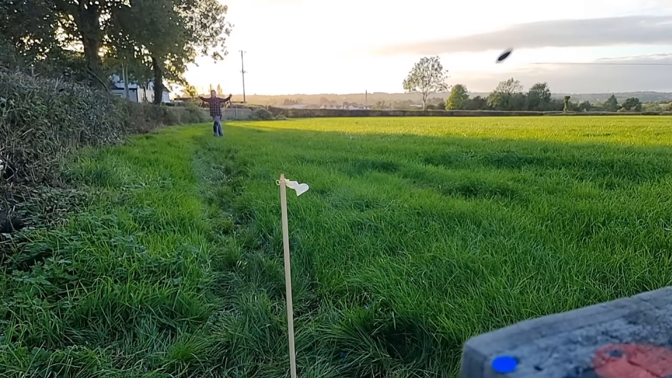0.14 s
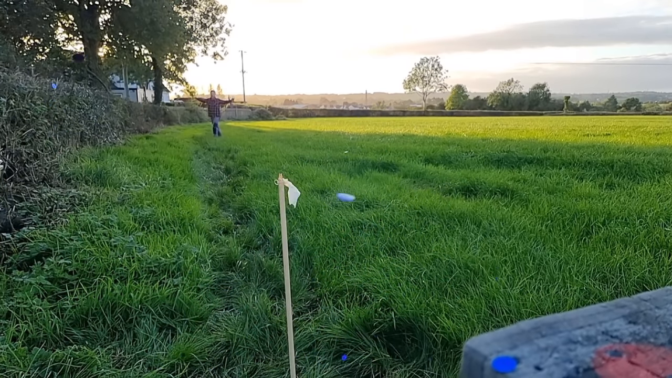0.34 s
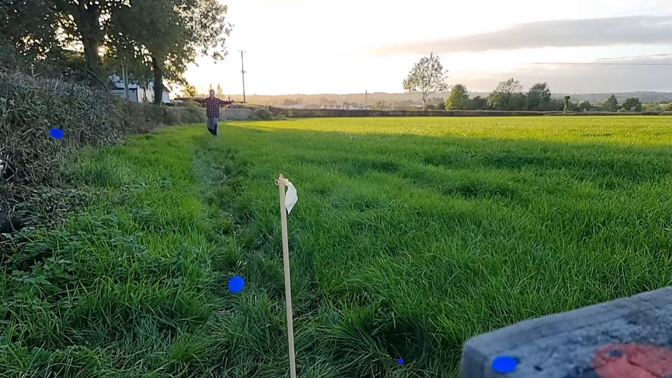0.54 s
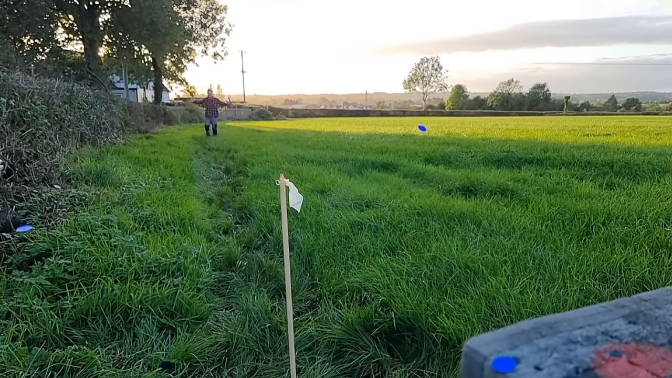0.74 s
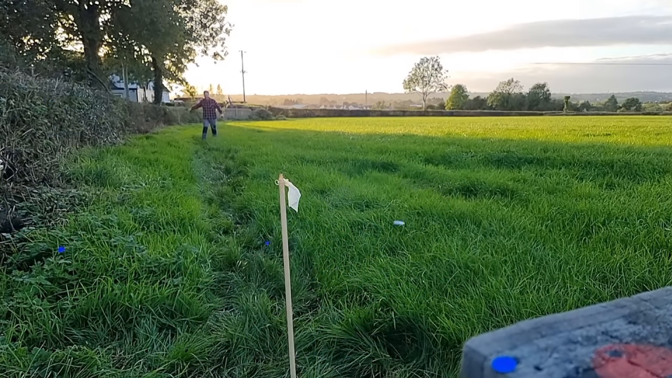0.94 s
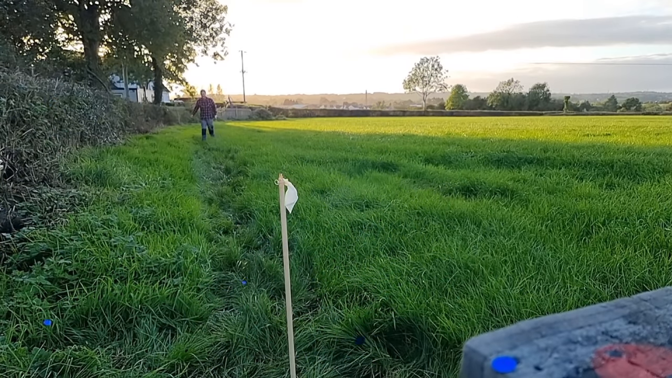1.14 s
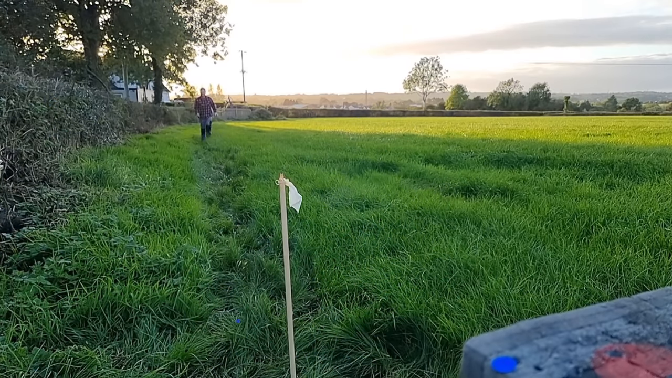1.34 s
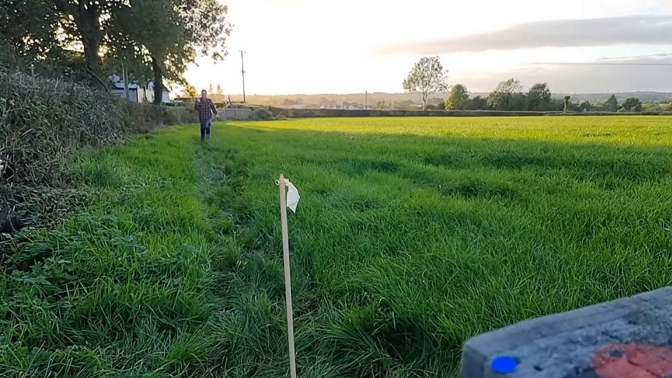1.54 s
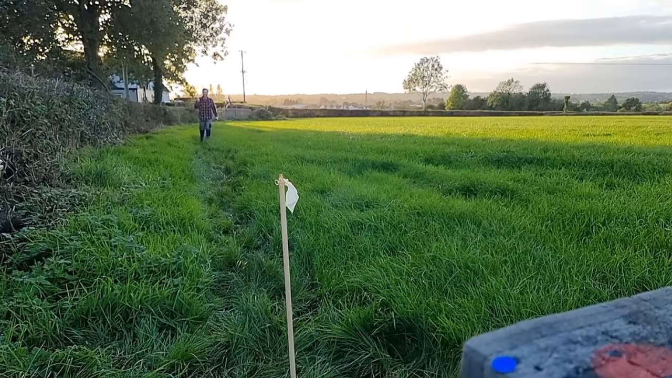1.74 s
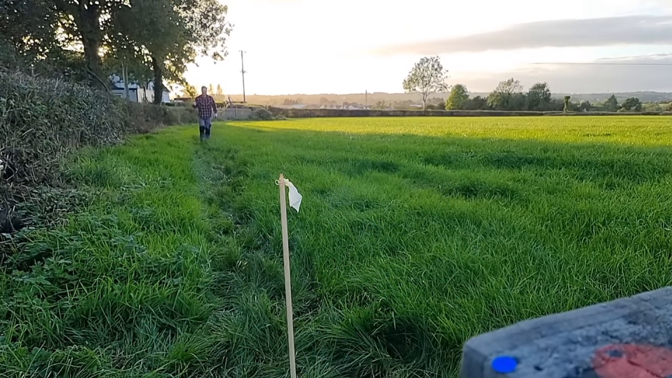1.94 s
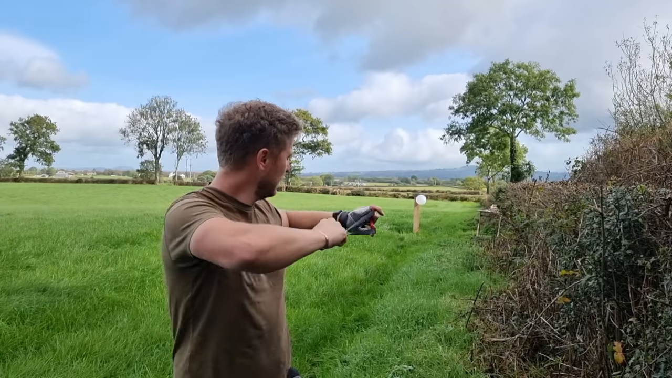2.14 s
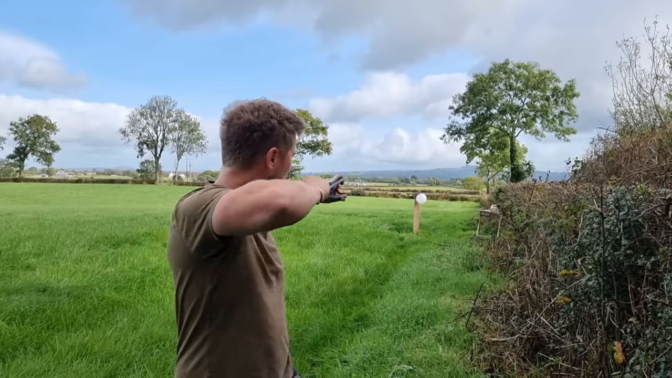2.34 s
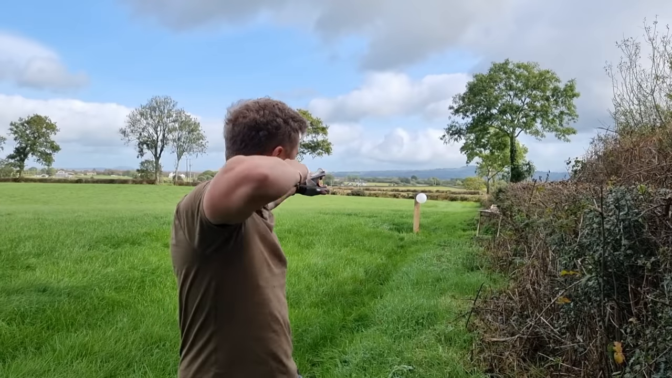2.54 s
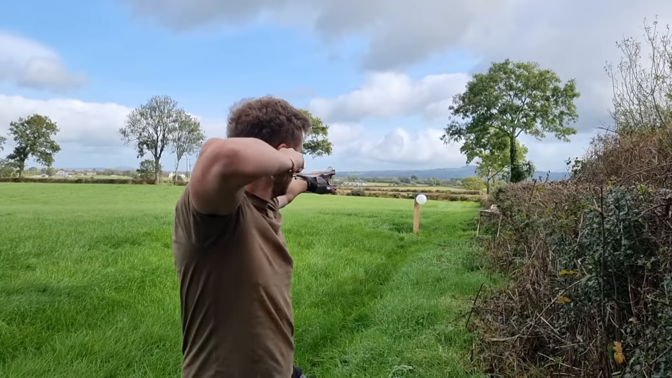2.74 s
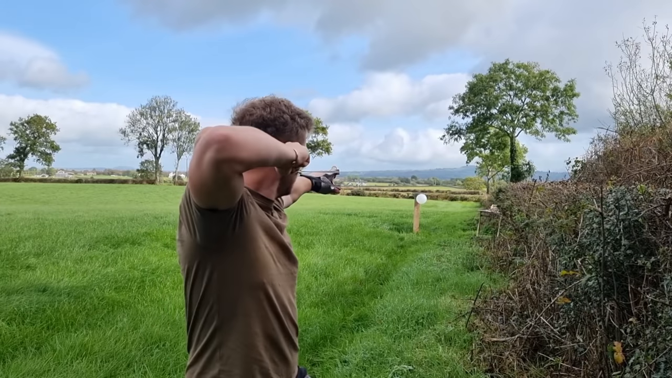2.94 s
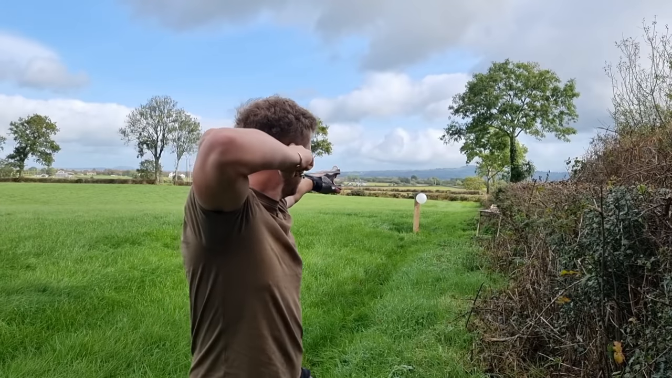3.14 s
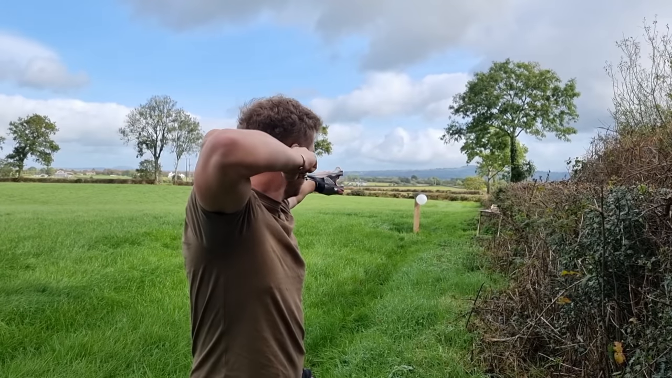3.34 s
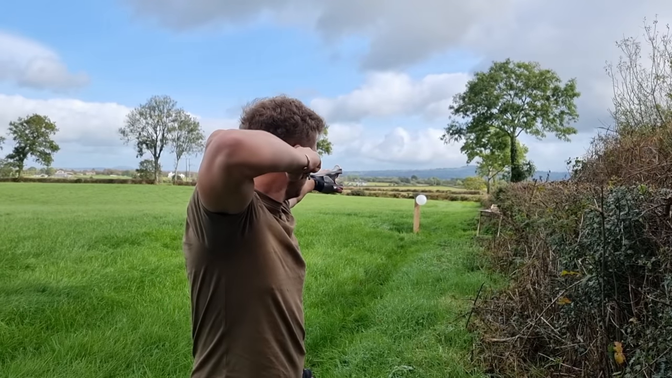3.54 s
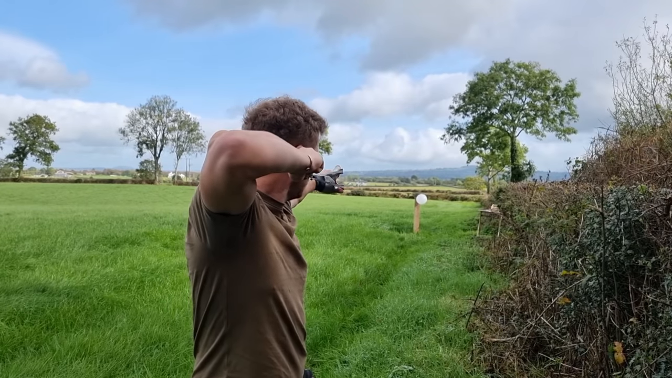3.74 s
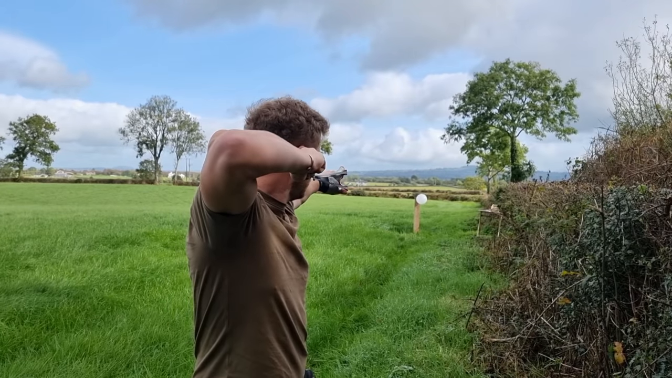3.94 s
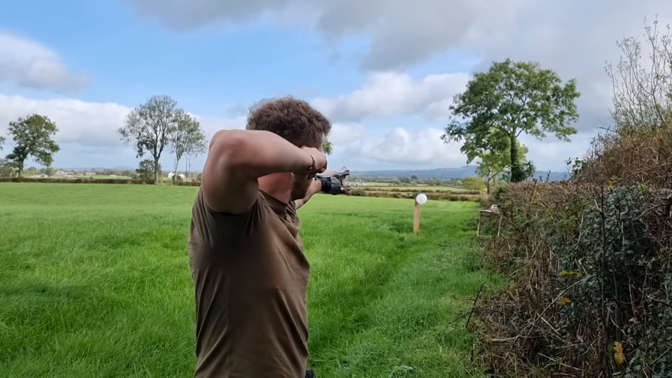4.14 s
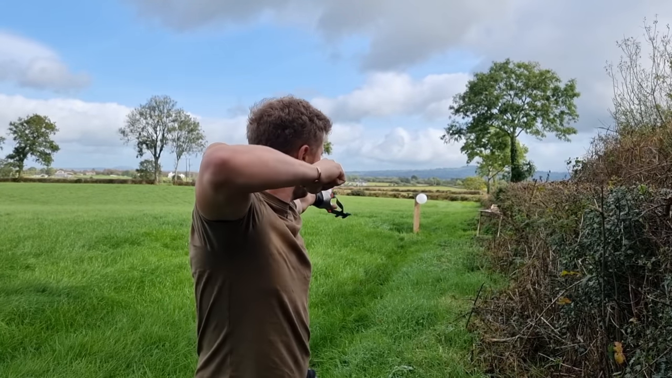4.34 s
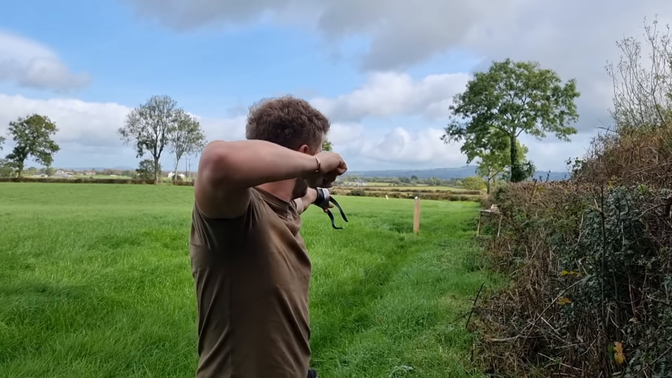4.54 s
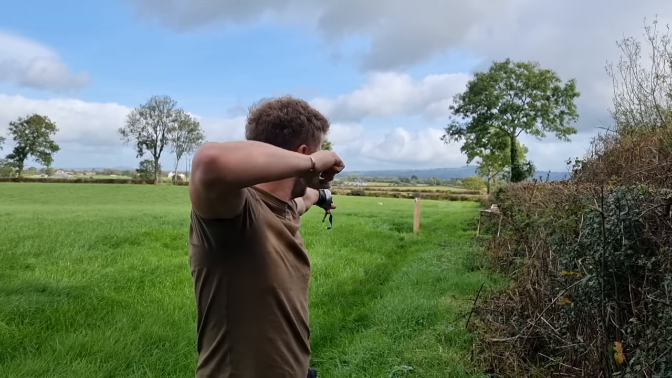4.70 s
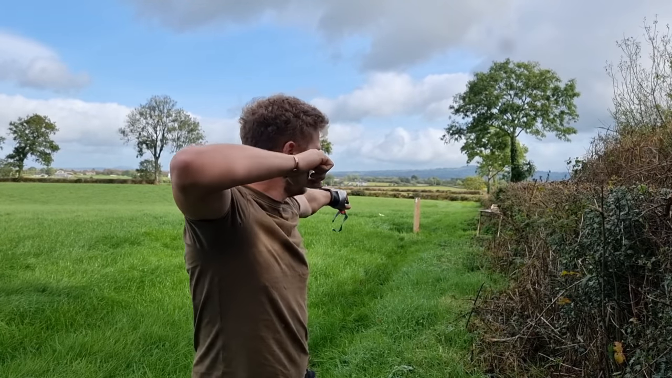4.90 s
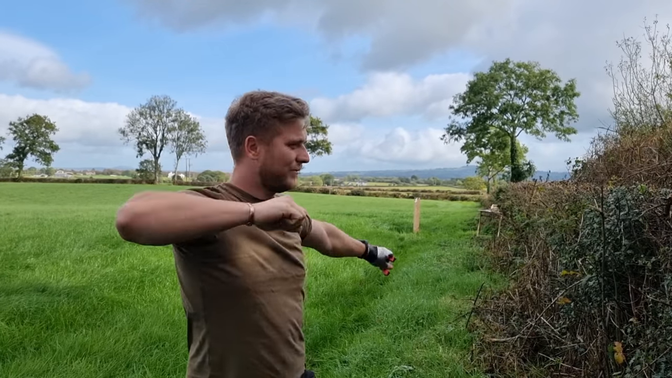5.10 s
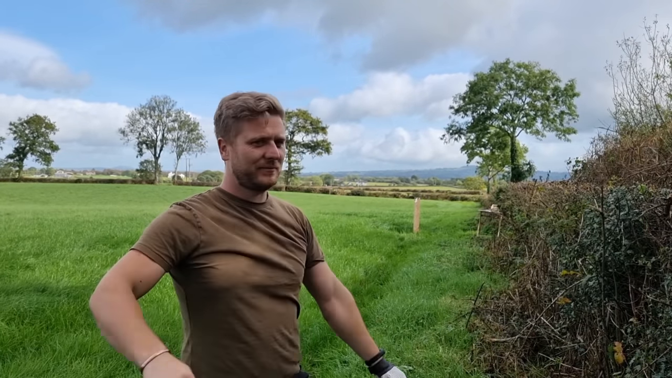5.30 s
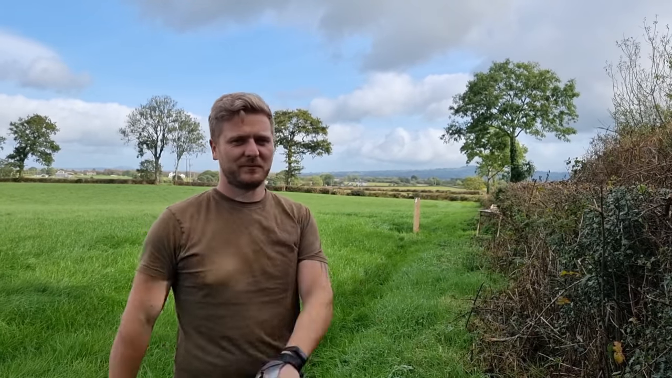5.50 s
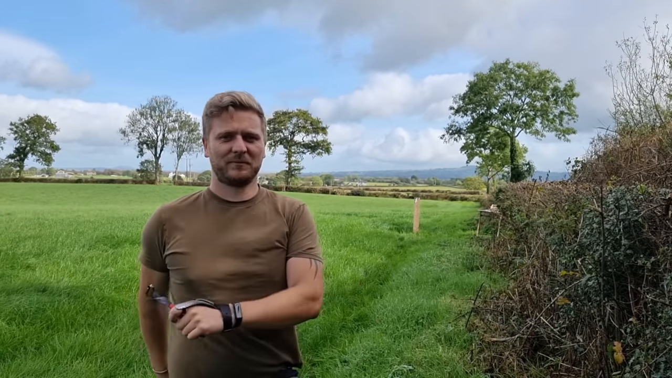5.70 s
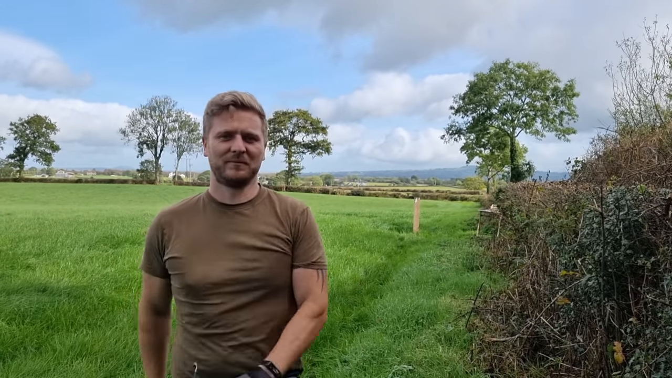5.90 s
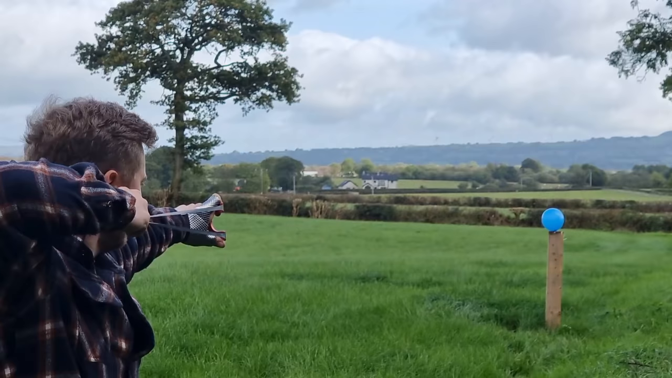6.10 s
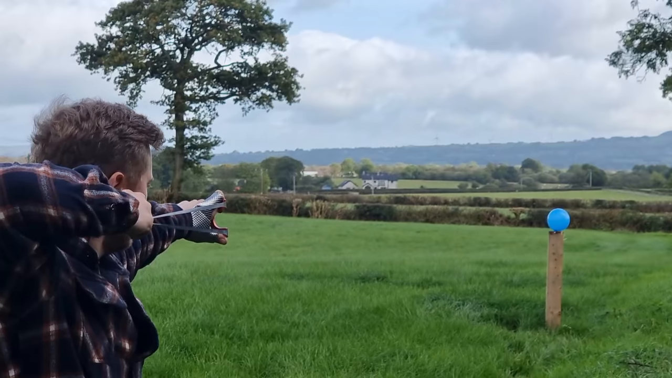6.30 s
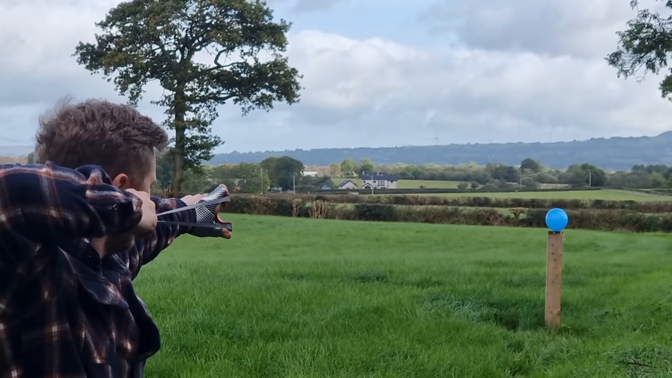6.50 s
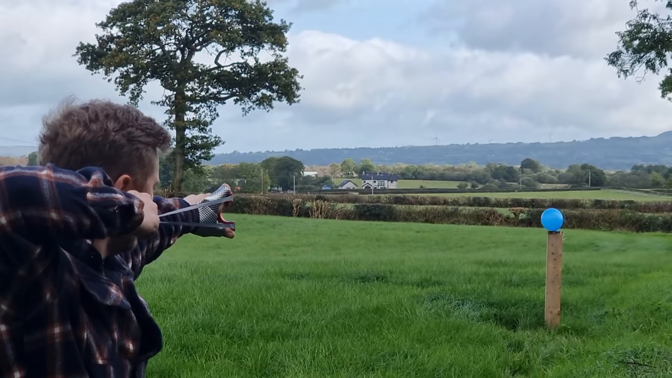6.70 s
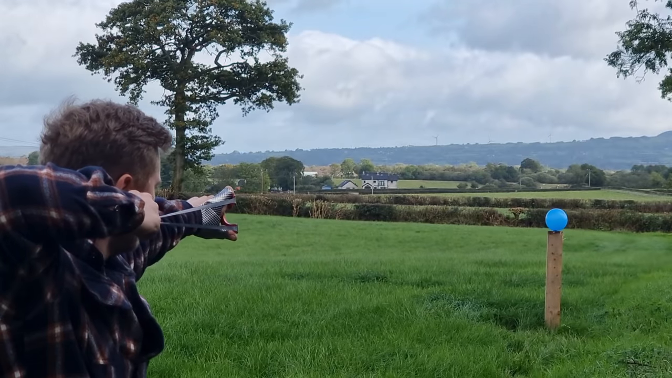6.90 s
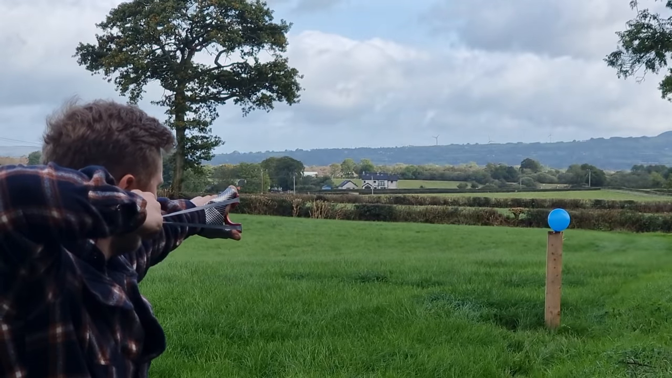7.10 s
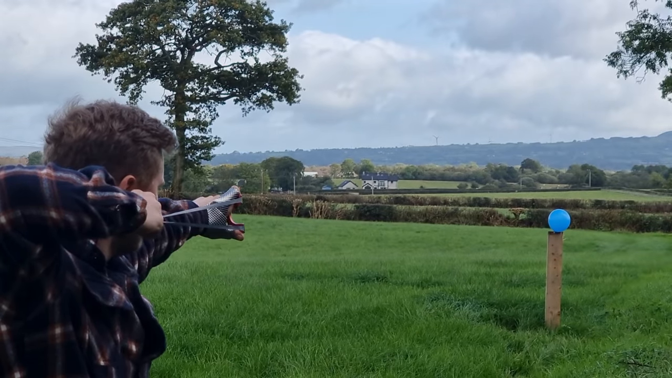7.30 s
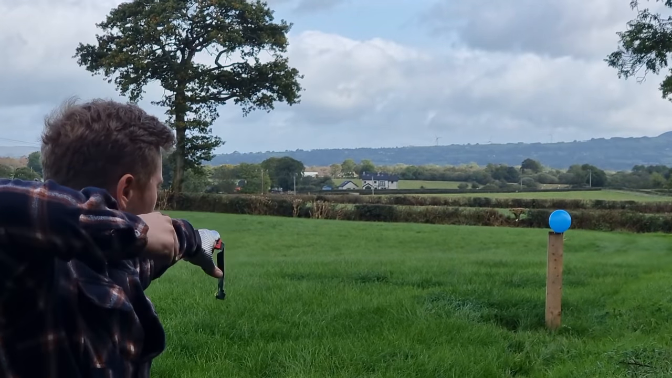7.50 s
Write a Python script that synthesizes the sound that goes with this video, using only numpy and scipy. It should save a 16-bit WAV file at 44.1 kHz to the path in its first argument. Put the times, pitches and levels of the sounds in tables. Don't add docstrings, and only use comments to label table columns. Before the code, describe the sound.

An open field in three takes, in stereo. From 0 to 2.4 s it is quiet: airy distant road noise, light wind, hoarse far rook calls from about 1 s and small crisp leaf rustles. At 2.4 s the background turns duller and wind rumbles unevenly against the microphone. A bird gives a high two-voiced buzz, then slurred whistles from the right until about 3.1 s, with faint rooks and low, slowing engines far off. At 4.33 s slingshot bands slap in a quick clatter with a short airy whip; at 4.60 s a balloon bursts, very loud and sharp, its bright echo scattering off hedge and trees until about 5.2 s. Wind continues, and cloth rubs near 6.1 s. From 6.3 s a new gusty take has a faint falling engine whine and paired, falling bird chips at 6.7-7.1 s. At 7.5 s the bands snap again, close and crisp, and it ends.

```python
import sys
import numpy as np
from scipy import signal
from scipy.io import wavfile

SR = 44100
rng = np.random.default_rng(int(sys.argv[2]) if len(sys.argv) > 2 else 0)


def dump_mix(stems):
    frames = np.atleast_2d(stems).T
    limited = np.clip(frames, -1, 1)
    pcm = np.round(limited * 32767).astype(np.int16)
    wavfile.write(sys.argv[1], SR, pcm)


def gain_from_db(level_db):
    decades = np.asarray(level_db, float) / 20
    return 10 ** decades


N = 332938
TIME = np.arange(N) / SR

TAKE_EDGES = (0, 2.375, 6.3, 7.56)


def in_time(rows, outside=None):
    s, *columns = np.transpose(rows)
    return [np.interp(TIME, s, column, outside, outside) for column in columns]


def span(rows):
    s, *columns = np.transpose(rows)
    a, b = int(s[0] * SR), min(int(s[-1] * SR), N)
    return a, b, [np.interp(TIME[a:b], s, column) for column in columns]


def at_hz(points, hz):
    points = np.array(points)
    return np.interp(np.log(hz), np.log(np.maximum(points[:, 0], 1)), points[:, 1])


def rms_one(x):
    return x / np.sqrt(np.mean(x ** 2) + 1e-20)


def drift(rate_hz, size):
    knots = rng.standard_normal(int(size / SR * 60) + 3)
    return np.interp(np.arange(size) / SR * min(rate_hz, 59), np.arange(len(knots)), knots) * 1.22


def bands(spectrum, size, lo_hz, hi_hz):
    settle = 4000
    white = rng.standard_normal((2, 2, size + settle))
    edges = np.geomspace(lo_hz, hi_hz, int(3 * np.log2(hi_hz / lo_hz)) + 2)
    for k, (low, high) in enumerate(zip(edges, edges[1:])):
        hz = np.sqrt(low * high)
        band = signal.butter(2, [low, high], "band", fs=SR, output="sos")
        rows = signal.sosfilt(band, white[k % 2])
        yield hz, gain_from_db(at_hz(spectrum, hz)) * rows[:, settle:]


def peak(x, hz, width_hz):
    r = np.exp(-np.pi * width_hz / SR)
    zeros = np.array([1, 0, -1]) * (1 - r * r) / 2
    return signal.lfilter(zeros, [1, -2 * r * np.cos(2 * np.pi * hz / SR), r * r], x)


def ring(x, hz, t60):
    r, w = gain_from_db(-60 / (t60 * SR)), 2 * np.pi * hz / SR
    return signal.lfilter([0, np.sin(w)], [1, -2 * r * np.cos(w), r * r], x)


def place(x, pan_db, lag):
    return np.array([np.roll(x, lag) * gain_from_db(pan_db / 2), x * gain_from_db(-pan_db / 2)])


def scatter(x, t60, a_s, b_s):
    a, b = int(a_s * SR), int(b_s * SR)
    lag = np.arange(int(.45 * SR)) / SR
    tail = rng.standard_normal((2, len(lag))) * gain_from_db(-60 * lag / t60) * (lag > .003)
    tail = tail / np.sqrt(np.sum(tail ** 2) / 2)
    out = np.zeros((2, N))
    out[:, a:b] = signal.fftconvolve(x[None, a:b], tail, axes=1)[:, :b - a]
    return out


# pitch_hz, density_db (per Hz)
AIR_COLOUR = [
    [(59, -30), (100, 1.5), (223, -7.5), (370, -20), (552, -12), (898, -9), (1590, -21), (1850, -28.5),
     (2050, -35.5), (2580, -37.5), (5280, -41), (6660, -35.5), (8230, -48.5), (9340, -40), (13900, -42.5),
     (15500, -58)],
    [(59, -30), (100, -7.5), (146, -10.5), (205, -13.5), (233, -15.5), (270, -17), (306, -18.5),
     (340, -15.5), (429, -20), (1160, -22.5), (2220, -43), (6530, -49.5), (8060, -69), (15500, -63.5)],
    [(59, -30), (100, -3), (162, -15.5), (233, -19), (758, -19.5), (808, -20.5), (1370, -29.5),
     (1550, -32.5), (2750, -42.5), (2990, -40), (3180, -45.5), (6530, -53), (7890, -69.5), (15500, -58.5)],
]
# pitch_hz, side_minus_mid_db
AIR_WIDTH = [
    [(60, -11), (110, -17), (200, -10), (380, -4.5), (700, -2), (1290, 5), (2380, -0.5), (4400, 2.5),
     (8120, -2.5), (15000, 2.5)],
    [(60, -1), (110, -10.5), (200, -8.5), (380, -0.5), (700, 7.5), (1290, 2.5), (2380, 0), (4400, 1.5),
     (8120, 1), (15000, 1.5)],
    [(60, -1), (110, -8), (200, -19), (380, -7), (700, -1), (1290, 1.5), (2380, -1), (4400, 0.5),
     (8120, -1), (15000, 1.5)],
]
AIR_TOP_HZ = [15500, 7600, 7600]
# time_s, level_db
ROAD_LEVEL = [(0.0, -76.5), (0.14, -71.5), (1.03, -66.5), (2.65, -65.5), (4.79, -63.5), (5.3, -63.5),
              (6.5, -62), (7.55, -62.5)]


def field(patchy_db=1.6):
    out = np.zeros((2, N))
    for a_s, b_s, colour, width, top_hz in zip(TAKE_EDGES, TAKE_EDGES[1:], AIR_COLOUR, AIR_WIDTH, AIR_TOP_HZ):
        a, b = int(a_s * SR), min(int(b_s * SR), N)
        far, hiss = np.zeros((2, b - a)), np.zeros((2, b - a))
        road_power = 1e-20
        for hz, (mid, side) in bands(colour, b - a, 100, 15500):
            road_power += np.mean(mid ** 2) * (450 < hz < 1400)
            rows = mid + gain_from_db(at_hz(width, hz)) * side * [[1], [-1]]
            edge_lift_db = 11.0 * (.9 * top_hz < hz < 1.1 * top_hz)
            rows = rows * gain_from_db(patchy_db * drift(11, b - a) + edge_lift_db)
            if hz < 1.1 * top_hz:
                far = far + rows
            else:
                hiss = hiss + rows
        far = signal.sosfilt(signal.cheby2(8, 30, top_hz, fs=SR, output="sos"), far)
        out[:, a:b] = (far + hiss) / np.sqrt(road_power)
    return out * gain_from_db(in_time(ROAD_LEVEL)[0])


# time_s, level_db
WIND_LEVEL = [(0.0, -80), (.5, -68.5), (1.0, -72), (1.5, -63), (2.3, -67.5), (2.44, -57.5), (2.8, -51.5),
              (3.45, -51), (4.0, -54), (4.65, -47.5), (5.3, -53), (6.0, -55.5), (6.8, -45.5), (7.15, -54),
              (7.55, -54.5)]
# pitch_hz, density_db (per Hz)
WIND_COLOUR = [(12, -36), (20, -2), (48, 2), (70, 3), (83, -3), (231, -33), (274, -31), (300, -25),
               (390, -55), (660, -120)]
# time_s, above_wind_db, left_minus_right_db
PORT_EDDIES = [(2.94, 6, 6.5), (3.32, 8.5, -11), (3.392, 6.5, 6), (3.56, 3, -9), (3.731, 6.5, 3),
               (3.849, 6, 12), (4.3, 5.5, -7), (5.27, 6, 10), (5.5, 9.5, 4), (5.8, 6.5, -3.5),
               (6.58, 2, 5.5), (6.9, 8, -3), (7.02, 6, -1.5), (7.38, 5.5, -8.5)]


def wind(lumpy_db=3.5):
    eddy_s, lean_left_db = 0.066, 3
    times, eddy_db, eddy_pan_db = np.transpose(PORT_EDDIES)
    reach = np.array([np.exp(-((TIME - s) / eddy_s) ** 2) for s in times])
    level_db = in_time(WIND_LEVEL)[0] + eddy_db @ reach
    pan_db = lean_left_db + eddy_pan_db @ reach
    brighten = np.where(TIME < TAKE_EDGES[2], .1, .9) * (level_db + 48.5)
    rumble = sum(rows * gain_from_db(brighten * (hz > 100)) for hz, rows in bands(WIND_COLOUR, N, 15, 300))
    left, right = rms_one(rumble)
    alike = np.where(TIME < TAKE_EDGES[1], .87, .1)
    right = alike * left + np.sqrt(1 - alike ** 2) * right
    lumps = gain_from_db([lumpy_db * drift(16, N) + pan_db / 2, lumpy_db * drift(20, N) - pan_db / 2])
    return np.array([left, right]) * lumps * gain_from_db(level_db + 6.0)


# time_s, reach_s, level_db
STIRS = [
    [(0.912, 0.043, -80.5), (1.066, 0.04, -77.5), (1.18, 0.15, -81.5), (1.49, 0.015, -71.5),
     (1.624, 0.088, -72), (1.798, 0.026, -74), (2.32, 0.043, -72.5)],
    [(6.08, 0.15, -78.5), (6.15, 0.053, -71.5), (6.236, 0.039, -73)],
]
# pitch_hz, density_db (per Hz)
STIR_COLOUR = [
    [(1470, -34), (2500, -2), (3430, -0.5), (4590, -1.5), (6630, 7), (8420, -2.5), (14000, -5),
     (15000, -14)],
    [(1470, -31), (2500, 1), (3170, -4.5), (6850, -1), (7800, -18), (8160, -32), (9660, -5.5), (11200, -10),
     (13600, -6.5), (15500, 2)],
]


def rustle(grain_db=2.0):
    fall_db = 9
    out = np.zeros((2, N))
    for stirs, colour in zip(STIRS, STIR_COLOUR):
        a, b = int((stirs[0][0] - .3) * SR), int((stirs[-1][0] + .15) * SR)
        t = TIME[a:b]
        power = sum(gain_from_db(db - fall_db * np.abs(t - s) / reach) ** 2 for s, reach, db in stirs)
        hiss = rms_one(sum(rows for hz, rows in bands(colour, b - a, 2500, 15500)))
        out[:, a:b] = hiss * np.sqrt(power) * gain_from_db(2.5 + grain_db * drift(45.0, b - a))
    return out


# start_s, length_s, start_hz, end_hz, level_db
ROOK_CALLS = [(3.59, 0.099, 3650, 3730, -79), (1.061, 0.163, 1550, 1620, -67),
              (1.372, 0.093, 1485, 1566, -64), (1.407, .22, 1950, 1474, -65.5),
              (1.487, 0.21, 2230, 2030, -72), (1.662, 0.054, 2250, 1870, -64),
              (1.809, 0.088, 2250, 2600, -71.5), (1.97, 0.083, 1480, 1410, -68),
              (1.998, 0.21, 1950, 1700, -69.5), (2.302, 0.066, 2270, 2200, -75),
              (6.31, 0.027, 2090, 2100, -74), (6.405, .028, 2900, 2950, -71),
              (6.747, 0.031, 2460, 1830, -65.5), (6.751, .024, 3380, 2850, -73),
              (6.886, 0.054, 2270, 1800, -71), (7.053, .025, 2290, 2100, -72),
              (3.093, 0.068, 3050, 3270, -68.5), (.7, .12, 2330, 2290, -82), (3.1, 0.11, 1400, 1270, -62),
              (3.13, 0.17, 1850, 1666, -71), (6.302, 0.0075, 1500, 900, -56.5),
              (1.88, 0.061, 1950, 1890, -71)]


def rooks():
    clear_s, hoarse_s, hoarseness = 0.052, 0.057, 0.51
    out = np.zeros(N)
    for s, long, from_hz, to_hz, db in ROOK_CALLS:
        a, size = int(s * SR), int(long * SR)
        rough = signal.lfilter([1], [1, -1.93, .9312], rng.standard_normal(12000))
        rough = rms_one(rough[2000:])[:size]
        hoarse = hoarseness * np.clip((long - clear_s) / (hoarse_s - clear_s), 0, 1)
        tone = np.sin(2 * np.pi * np.cumsum(np.linspace(from_hz, to_hz, size)) / SR)
        voice = (1 - hoarse + hoarse * rough) * tone
        out[a:a + size] += gain_from_db(db) * voice * signal.windows.tukey(size, .6)
    return out


def whistle(rows, second_db, warble_hz, warble_rate):
    out = np.zeros(N)
    a, b, (hz, level_db) = span(rows)
    beat = 2 * np.pi * warble_rate * TIME[a:b] + 1.5 * drift(50, b - a)
    turn = 2 * np.pi * np.cumsum(hz + warble_hz * np.sin(beat)) / SR
    tone = np.sin(turn) + gain_from_db(second_db) * np.sin(2 * turn)
    tone = tone + gain_from_db(second_db - 11) * np.sin(3 * turn) * (hz < 5200)
    out[a:b] = np.sqrt(2) * gain_from_db(level_db) * tone * signal.windows.tukey(b - a, .1)
    return out


# time_s, pitch_hz, level_db
BUZZ_VOICES = [
    [(2.375, 8300, -82), (2.395, 8560, -63), (2.412, 7820, -55.5), (2.435, 7820, -53), (2.46, 8260, -56),
     (2.485, 8070, -56), (2.515, 7930, -53.5), (2.545, 8020, -65), (2.585, 8100, -77)],
    [(2.37, 7140, -79), (2.395, 7450, -59), (2.406, 7250, -68), (2.411, 6980, -48.5), (2.44, 7140, -55),
     (2.47, 7480, -51.5), (2.505, 7140, -55.5), (2.527, 7200, -61.5), (2.56, 7200, -74.5)],
]
BUZZ_TREMBLE_HZ = [140., 210.]
BUZZ_PARTIAL_DB = [-24, -18]
# time_s, pitch_hz, level_db
PULSED_NOTE = [(2.605, 6500, -65), (2.609, 5550, -52.5), (2.614, 4520, -50.5), (2.628, 4265, -40.5),
               (2.641, 4620, -39), (2.652, 4350, -40), (2.671, 4217, -43), (2.686, 4270, -49.5),
               (2.697, 4380, -55)]
# time_s, pitch_hz, level_db
SWELLING_NOTE = [(2.828, 5570, -61), (2.833, 5030, -52), (2.842, 4644, -44), (2.858, 4683, -39),
                 (2.869, 4720, -58.5), (2.878, 4746, -43.5), (2.91, 4746, -54.5), (2.92, 4740, -64)]
# time_s, pitch_hz, level_db
OTHER_NOTES = [
    [(2.6955, 5800, -59), (2.698, 5250, -50.5), (2.702, 4930, -46), (2.714, 4740, -39), (2.726, 4610, -37),
     (2.748, 4615, -42), (2.758, 4560, -64)],
    [(2.855, 5600, -62), (2.863, 5555, -52), (2.9, 5480, -73)],
    [(2.898, 4820, -47), (2.904, 3980, -57), (2.912, 3410, -61), (2.93, 2770, -63.5), (2.958, 2844, -56),
     (3.0, 2954, -57), (3.022, 3050, -56)],
    [(2.985, 3266, -56), (3.006, 3520, -62), (3.02, 3900, -65), (3.036, 4050, -56), (3.056, 4010, -55),
     (3.066, 3960, -72)],
    [(3.074, 3940, -73), (3.084, 3945, -59.5), (3.11, 3980, -76), (3.13, 3960, -83)],
    [(3.0, 3250, -72), (3.02, 3350, -62), (3.04, 3560, -65), (3.06, 3500, -70)],
    [(2.856, 6380, -76), (2.864, 6400, -70), (2.885, 6330, -80)],
]
NOTE_PARTIAL_DB = [-51, -35, -53, -42, -47, -60, -57, -59, -58]


def songbird():
    hum = sum(whistle(voice, db, warble_hz=hz, warble_rate=110.0)
              for voice, hz, db in zip(BUZZ_VOICES, BUZZ_TREMBLE_HZ, BUZZ_PARTIAL_DB))
    notes = [whistle(note, db, warble_hz=48., warble_rate=65.)
             for note, db in zip([PULSED_NOTE, SWELLING_NOTE] + OTHER_NOTES, NOTE_PARTIAL_DB)]
    throb_rate_hz, throb_depth, throb_dip_s = 54, .55, 2.627
    throb = throb_depth * np.cos(2 * np.pi * throb_rate_hz * (TIME - throb_dip_s))
    song = sum(notes) - notes[0] * throb
    near = gain_from_db(-2.5) * place(hum, -3.0, lag=4) + gain_from_db(-1.5) * place(song, -8.0, lag=0)
    leaves = scatter(hum + gain_from_db(-4.5) * song, 0.061, 2.3, 3.5)
    trees = scatter(.6 * hum + song, 0.36, 2.3, 3.5)
    return near + leaves + gain_from_db(-11.0) * trees


# start_s, end_s, first_turn_hz, last_turn_hz
ENGINE_RUNS = [
    (2.38, 5.6, 24.05, 23.6),
    (3.3, 6.3, 34.8, 34.3),
    (6.4, 7.35, 575, 488),
]
# multiple, level_db
ORDERS = [
    [(8, -68), (9, -67), (11, -64), (12, -64), (14, -64), (15, -64)],
    [(5, -65), (6, -64), (7.4, -70), (10, -69), (11, -67)],
    [(1, -68)],
]
# share_of_run, level_db
PASSING = [
    [(0, -11.5), (.3, -5.5), (.55, 1), (.85, 0), (1, -16.5)],
    [(0, -20), (.5, -10.5), (.65, 0), (.99, -1), (1, -20.5)],
    [(0, -13.5), (.3, -2), (.55, -5.5), (.75, 7), (1, -11)],
]


def drone():
    out = np.zeros(N)
    for (a_s, b_s, from_hz, to_hz), orders, passing in zip(ENGINE_RUNS, ORDERS, PASSING):
        a, b, (hz,) = span([(a_s, from_hz), (b_s, to_hz)])
        turn = 2 * np.pi * np.cumsum(hz) / SR
        lines = sum(gain_from_db(db + 1.8 * drift(2.5, b - a)) * np.sin(k * turn + 0.45 * drift(6.2, b - a))
                    for k, db in orders)
        out[a:b] += lines * gain_from_db(np.interp(np.linspace(0, 1, b - a), *np.transpose(passing)))
    return place(out, 0., lag=16)


# time_s, peak_db, centre_hz, thud_share
BAND_SLAPS = [(4.3325, -32, 4000, .1), (4.3365, -28, 6800, .1), (4.3385, -28, 2800, .2),
              (4.3515, -26, 2200, 1.3), (4.347, -34, 3000, .3), (4.3545, -19, 3600, 1.3),
              (4.3595, -21.0, 3200, 1.3), (4.37, -14, 4600, 1.2), (4.3755, -25.4, 6000, .6),
              (7.4942, -20, 13500, .03), (7.4965, -28.2, 3300, .05), (7.4985, -27, 13500, .03),
              (7.5005, -26, 12500, .03), (7.5025, -31, 13000, .03), (7.5095, -23, 3000, .8),
              (7.5125, -19, 4400, .3), (7.5167, -16.5, 1150, .5), (7.5172, -22, 4800, .1),
              (7.5235, -24, 6500, .4), (7.528, -15.5, 7200, .3), (7.532, -24, 1500, .1),
              (7.5345, -23, 12000, .1)]
# release_s, hiss_db, left_minus_right_db
RELEASES = [
    (4.332, -34.5, -1.5),
    (7.492, -30, .5),
]
RING_DB = [-48.5, -41]
# after_release_s, level_db
WHIP_LEVEL = [(0, -31.5), (.014, -18.5), (.024, -1.5), (.042, -4.5), (.058, -13), (.078, -17.5), (.1, -28),
              (.13, -38.5), (.19, -53)]
# pitch_hz, density_db (per Hz)
WHIP_COLOUR = [(120, -39), (200, 5.5), (635, -3.5), (722, -6), (1400, -1.5), (1770, -2.5), (6880, -11),
               (8420, -23), (14900, -10), (16000, -15)]
# pitch_hz, side_minus_mid_db
NEAR_WIDTH = [(200, -14), (900, -8), (1800, -8), (3500, -3), (7000, -3), (12000, -0.5)]


def slap(db, hz, thud, pan_db):
    since = np.arange(2000) / SR
    t60, rise_s = .0065, .0005
    mid, side = rng.standard_normal((2, 2000)) * gain_from_db(-60 * since / t60) * np.minimum(since / rise_s, 1)
    puff = mid + peak(side, 9000, 16000) * [[1.2], [-1.2]]
    body = peak(puff, hz, .55 * hz)
    click = .16 * min(hz / 3200, 1) ** 2 * np.diff(puff, prepend=0)
    puff = body + click
    puff = puff + thud * peak(mid + peak(side, 9000, 16000) * [[1.2], [-1.2]], 600, 800)
    return puff / np.abs(puff.mean(axis=0)).max() * gain_from_db([[db + pan_db / 2], [db - pan_db / 2]])


def slingshot():
    dull_db_per_s = 66
    out = np.zeros((2, N + 2000))
    for s, db, hz, thud in BAND_SLAPS:
        a = int(s * SR)
        pan_db = RELEASES[int(s > TAKE_EDGES[2])][2]
        out[:, a:a + 2000] += slap(db, hz, thud, pan_db)
    out = out[:, :N]
    for (s, db, pan_db), ring_db in zip(RELEASES, RING_DB):
        a, b, (level_db,) = span(np.add(WHIP_LEVEL, (s, db)))
        since = TIME[a:b] - s
        hiss = 0
        for hz, rows in bands(WHIP_COLOUR, b - a, 207.6, 16000):
            dulling = gain_from_db(dull_db_per_s * since * min(np.log2(hz / 6000), 0))
            hiss = hiss + rows * gain_from_db([[0], [at_hz(NEAR_WIDTH, hz)]]) * dulling
        mid, side = rms_one(hiss)
        out[:, a:b] += np.array([mid + side, mid - side]) * gain_from_db(level_db + 1.25 + 1.4 * drift(65, b - a))
        pluck = rng.standard_normal(b - a) * gain_from_db(-9000 * since) / 4
        out[:, a:b] += gain_from_db(ring_db) * ring(pluck, 2100, t60=0.11)
    return out


# time_s, level_db
TEAR_JERKS = [
    (4.6032, -12.5),
    (4.6042, -18),
    (4.6052, -2),
    (4.60566, -4.5),
    (4.6063, -6),
    (4.6072, -15),
    (4.6079, -14),
    (4.6086, -15),
]
# pitch_hz, t60_s, level_db
SKIN_MODES = [(1770, .0065, -2.5), (2200, .0065, -1.5), (2690, .007, -5), (1150, .008, -12.5),
              (720, .012, -8), (580, .012, -14), (1420, .007, -16), (3250, .005, -7), (3900, .005, -4.5),
              (5400, .005, -6), (7300, .004, -13), (11500, .003, -11)]
# pitch_hz, density_db (per Hz)
HEDGE_COLOUR = [(88, -34), (150, -4), (286, -6), (494, -13), (637, -10), (1560, -13), (2160, -7.5),
                (3220, -14.5), (3840, -17), (6510, -16.5), (9820, -26), (14800, -21), (16000, -35.5)]
# pitch_hz, t60_s
HEDGE_DECAY = [(150, 0.054), (600, 0.27), (2000, 0.64), (3800, 0.56), (6500, 0.36), (12000, 0.25)]
# after_burst_s, level_db
TREBLE_LIFT = [(.09, 2), (.115, 6), (.155, 9.5), (.168, -1), (.21, 0), (.25, 6)]


def balloon(crackle_db=-25, push_db=-14.5):
    start, size = TEAR_JERKS[0][0] - .001, int(.6 * SR)
    a, since = int(start * SR), np.arange(size) / SR
    tearing = np.interp(since, [0, .003, .006, .007], [.1, 1, .7, 0])
    jerks = gain_from_db(crackle_db) * rng.standard_normal((2, size)) * tearing
    for k, (s, db) in enumerate(TEAR_JERKS):
        jerks[:, int((s - start) * SR)] += gain_from_db(db) * (-1) ** (k == 5)
    left, right = gain_from_db(-7) * sum(gain_from_db(db) * ring(jerks, hz, t60) for hz, t60, db in SKIN_MODES)
    left = np.roll(.75 * left + .45 * peak(left, 6000, 3000), 4)
    late = np.maximum(since - .0036, 0)
    push = -np.sin(np.pi * (late / .0028) ** .7) * gain_from_db(-60 * late / .045)
    out = np.zeros((2, N))
    out[:, a:a + size] += np.array([left, right]) + gain_from_db(push_db) * push * [[1.15], [.85]]
    out += .55 * peak(out, 2300, 1500) - .85 * peak(out, 410, 150)
    out[:, a:a + size] += hedge(since)
    return out


def hedge(since):
    size = len(since)
    onset_db = np.interp(since, [.005, .009, .022, .056, .068], [-38.0, 5.0, 3.0, 0, -6.5])
    far_db = np.interp(since, *np.transpose(TREBLE_LIFT))
    tail = 0
    for hz, rows in bands(HEDGE_COLOUR, size, 150, 18000):
        treble_db = far_db * (hz > 4500) * (1 - 0.28 * (hz > 8000))
        decay_db = -60 * since / at_hz(HEDGE_DECAY, hz)
        tail = tail + rows * gain_from_db(2.5 * drift(55, size) + treble_db + decay_db)
    linger = .9 * peak(tail, 1950, 400) + 1.2 * peak(tail, 3700, 400)
    tail = tail + np.clip((since - .05) / .06, 0, 1) * linger
    return gain_from_db(onset_db - 36.0) * tail / np.std(tail[:, :3000])


# time_s, peak_db, centre_hz, spread_s
BURST_ECHOES = [(4.639, -29, 660, .004), (4.642, -32, 1250, .003), (4.645, -33, 3700, .005),
                (4.619, -27, 2100, .002), (4.633, -30, 2250, .002), (4.652, -30, 2300, .003),
                (4.667, -38, 2400, .002), (4.688, -27, 2030, .0012), (4.69, -38, 700, .003),
                (4.701, -41, 750, .005), (4.708, -40, 1950, .003), (4.7305, -32.5, 1900, .001),
                (4.739, -44, 700, .005), (4.769, -32, 1900, .0012), (4.772, -47, 600, .004),
                (4.784, -46, 2300, .002), (4.8, -42, 2000, .001), (4.848, -50, 1900, .003),
                (4.838, -52, 1830, .003), (4.8, -52, 540, .004), (5.087, -52, 2050, .002),
                (5.178, -48.5, 1620, .0008), (5.178, -62, 4200, .0006)]


def echoes():
    out, since = np.zeros((2, N)), np.arange(1500) / SR
    for s, db, hz, spread in BURST_ECHOES:
        puff = rng.standard_normal((2, 1500)) * since / spread * np.exp(1 - since / spread)
        mid, side = peak(peak(puff, hz, .3 * hz + 100), hz, .4 * hz + 150)
        width = 2.4 if hz < 1000 and s > 4.66 else .6
        mid, side = mid / np.abs(mid).max(), width * side / np.abs(side).max()
        a = int((s - .001) * SR)
        out[:, a:a + 1500] += (mid + side * [[1], [-1]]) * gain_from_db(db - 3.5)
    return out


# time_s, peak_db, end_hz
CHIP_CALLS = [
    (6.718, -65, 6500),
    (6.7402, -52.5, 4620),
    (6.908, -59.5, 4500),
    (6.933, -52, 4030),
    (7.085, -68, 5230),
    (7.109, -57, 4020),
]


def chips():
    top_hz, fall_s, rise_s, echo_s = 7500, 0.0023, .002, .0016
    calls, since = np.zeros(N), np.arange(900) / SR
    swell = (since / rise_s * np.exp(1 - since / rise_s)) ** 2
    for s, db, end_hz in CHIP_CALLS:
        hz = end_hz + (top_hz - end_hz) * np.exp(-(since / fall_s) ** 2)
        a = int((s - rise_s) * SR)
        calls[a:a + 900] += gain_from_db(db) * swell * np.sin(2 * np.pi * np.cumsum(hz) / SR)
    calls = calls + 0.74 * np.roll(calls, int(echo_s * SR))
    leaves = scatter(calls + 2.9 * peak(calls, 6300, 900), 0.13, 6.6, 7.5)
    return gain_from_db(2) * place(calls, 4.5, lag=-2) + gain_from_db(-9.5) * leaves


def scene():
    dip = 1 - 0.8 * np.exp(-((TIME - TAKE_EDGES[1]) / 0.028) ** 2)
    background = field() + wind() + rustle() + rooks() + drone()
    return dip * background + songbird() + slingshot() + balloon() + echoes() + chips()


def low_pass(x):
    return signal.sosfilt(signal.butter(12, 16650, fs=SR, output="sos"), x)


def record(dry):
    low_cut = signal.sosfilt(signal.butter(2, 34, "high", fs=SR, output="sos"), dry)
    rounded = low_cut / (1 + (low_cut / .84) ** 6) ** (1 / 6)
    mix = signal.sosfilt(signal.cheby2(12, 60, 16700, fs=SR, output="sos"), rounded)
    return low_pass(mix)


dry = scene()
out = record(dry)
dump_mix(out)
```